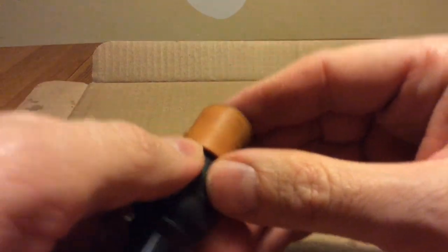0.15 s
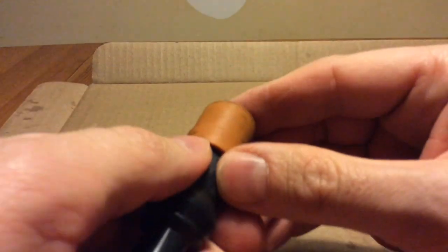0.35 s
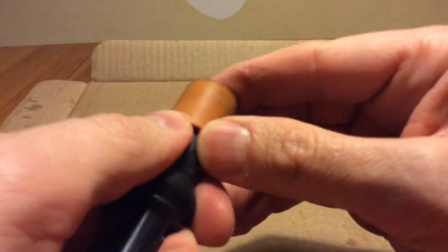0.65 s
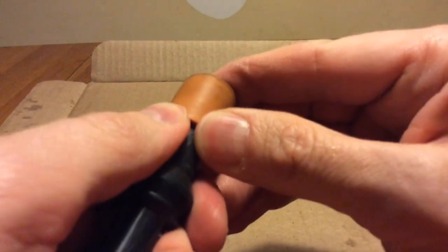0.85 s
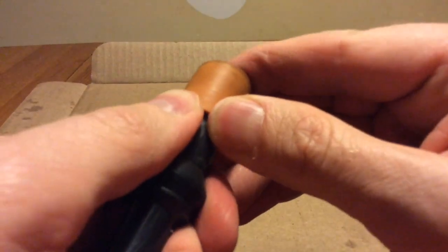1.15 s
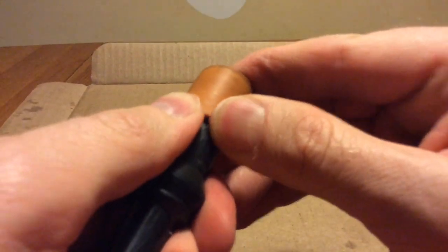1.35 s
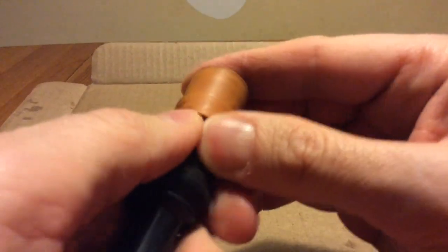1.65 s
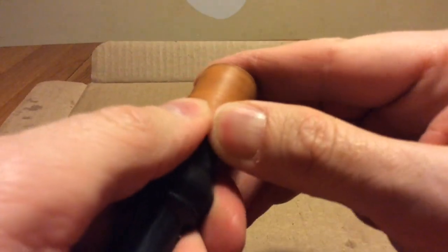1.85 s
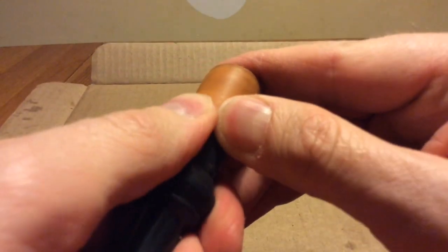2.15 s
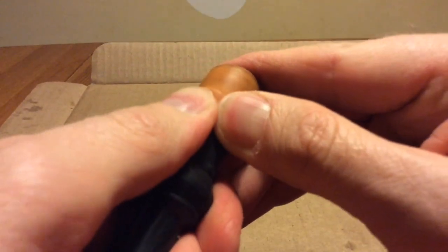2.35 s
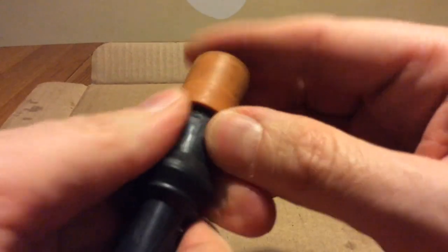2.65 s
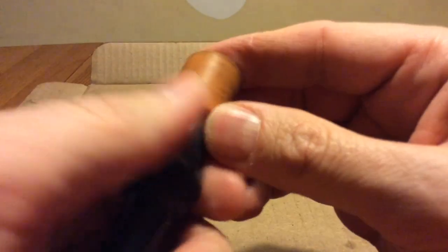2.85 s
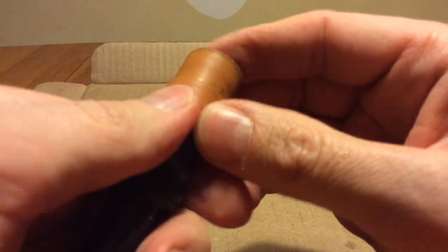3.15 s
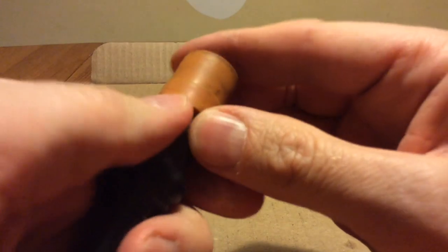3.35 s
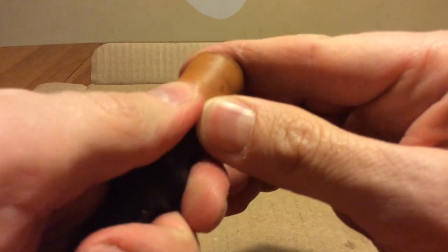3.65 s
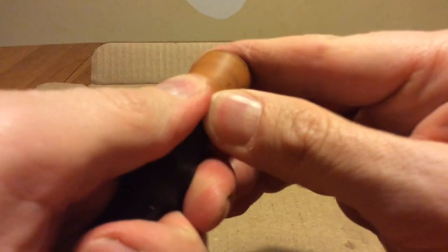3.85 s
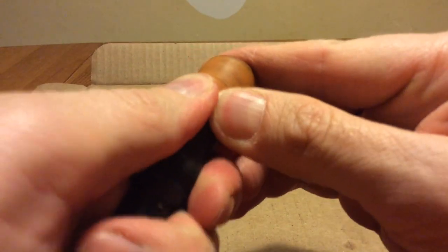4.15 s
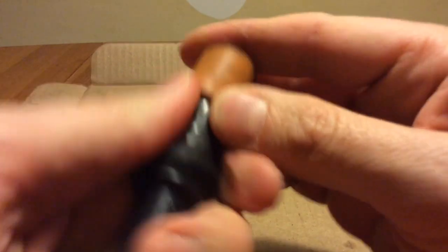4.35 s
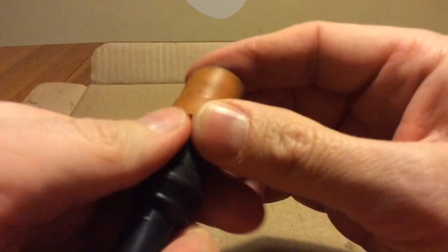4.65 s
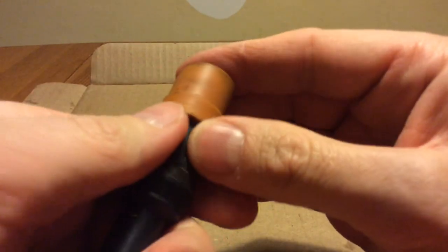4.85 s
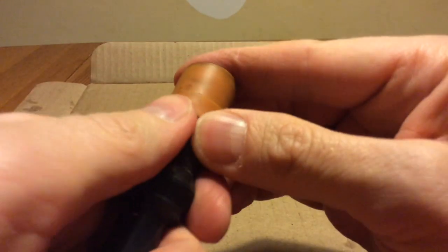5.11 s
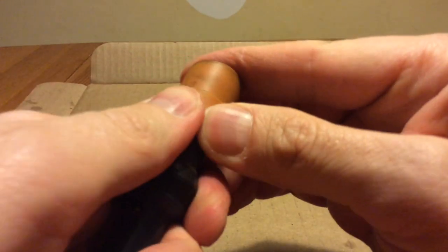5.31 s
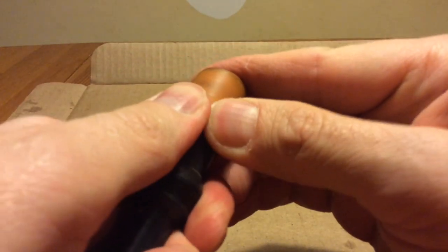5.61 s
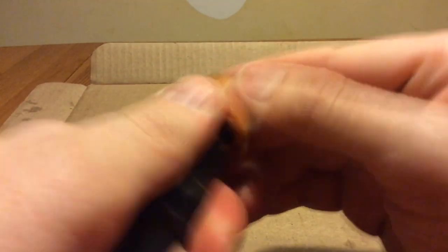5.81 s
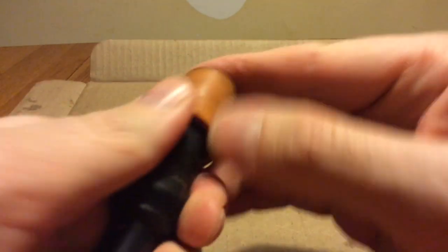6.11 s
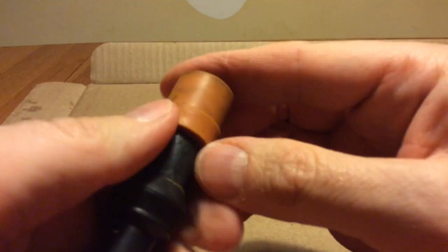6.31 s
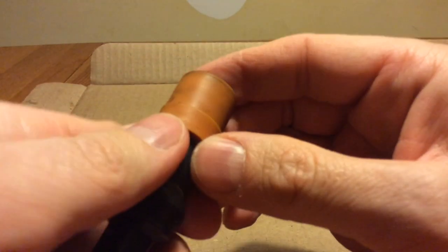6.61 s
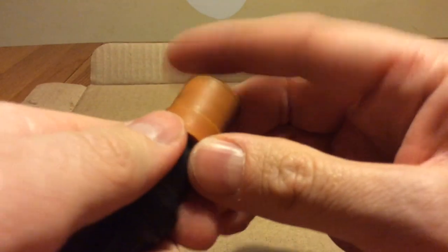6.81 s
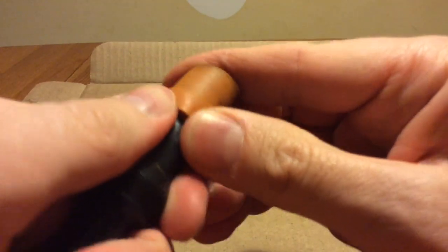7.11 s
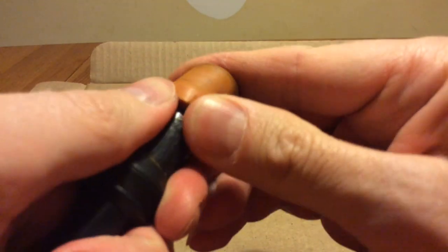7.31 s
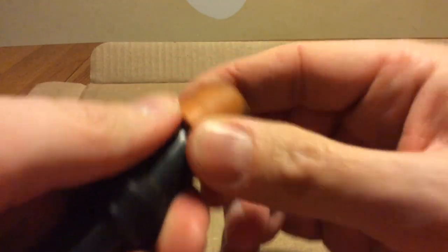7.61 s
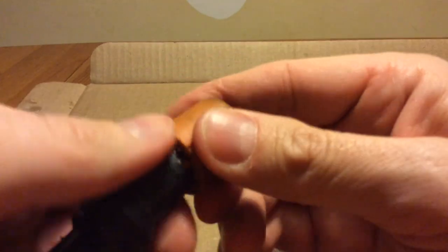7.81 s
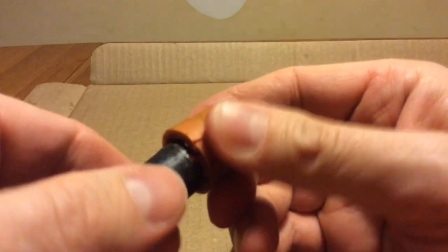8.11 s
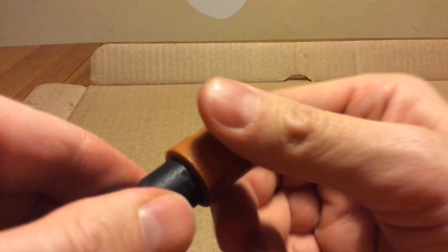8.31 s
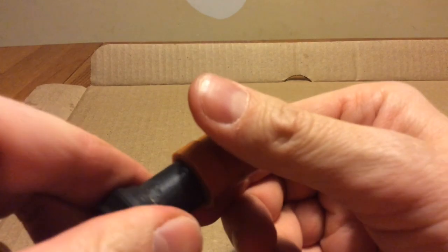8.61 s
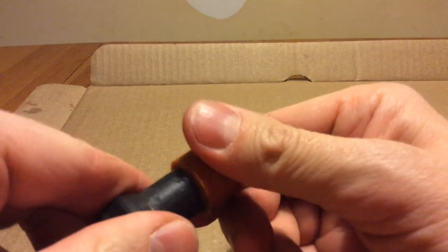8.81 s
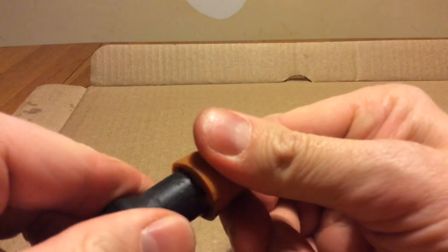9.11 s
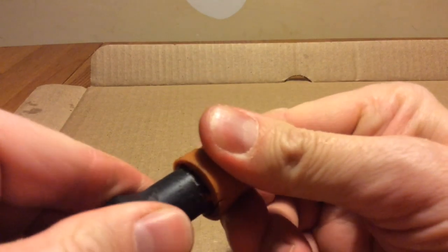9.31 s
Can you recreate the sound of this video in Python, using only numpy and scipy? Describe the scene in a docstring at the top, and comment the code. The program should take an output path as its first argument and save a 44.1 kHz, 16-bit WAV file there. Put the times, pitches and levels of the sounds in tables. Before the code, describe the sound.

Fingers twist a rubber boot on a car part, making a soft grainy rubbing with faint squeaks. Early on, the part knocks against a cardboard box. The stuck rubber lets go in two runs of sharp snaps, the hands bump, then a crackling peel ends in one hollow pop. More rubbing, soft bumps and a faint squeak follow, all close to the microphone in a small quiet room.

```python
"""Two hands twist and pull a rubber boot off an ignition coil, close up, over a cardboard box in a
small quiet room. Skin rubs and squeaks on the rubber from the start; at 0.5 s the coil knocks on the box.
The stuck boot lets go in runs of sharp snaps at 2.3 s and 4 s, and the hands bump as they change grip.
From 5.6 s the rubber peels for good, until the seal opens with one hollow pop at 5.9 s.
More rubbing, soft bumps and two stray snaps follow, and a faint squeak closes the scene."""
import sys
import numpy as np
from scipy import signal
from scipy.fft import rfft, irfft
from scipy.io import wavfile

SR = 44100
rng = np.random.default_rng(int(sys.argv[2]) if len(sys.argv) > 2 else 0)


def unload_audio(sound):
    """Save the sound as a 16-bit wav file, at the path given as the first command line argument."""
    columns = np.transpose(np.atleast_2d(sound))
    # keep every value between -1 and 1, then stretch to whole-number steps
    steps = np.round(np.clip(columns, -1, 1) * 32767)
    wavfile.write(sys.argv[1], SR, steps.astype(np.int16))


N = 417186
TIME = np.arange(N) / SR
LOW_CUT_HZ, HIGH_CUT_HZ = 60.26, 15250

# Spectra and most resonance levels are relative;
# fan, squeak, creak, knock and pop levels set the loudness directly.

# room tone, air and hiss: f/Hz, density/dB
AIR_SPECTRUM = [(25, -2.5), (101, -6), (226, 1), (479, -8), (563, -13.5), (644, -15.5), (756, -14.5),
                (1290, -31), (2460, -33), (3220, -26.5), (4820, -30), (9440, -42.5), (15300, -43.5)]
# faint fan tones: f/Hz, level/dB
FAN_TONES = [(215, -84.5), (538, -75.5), (587, -78)]
# the holding fingers creep over the rubber throughout: t/s, level/dB
GRIP_CREEP = [(0, -68), (1.15, -64.5), (1.3, -71), (1.45, -73), (2.2, -69.5), (2.45, -74), (2.55, -77),
              (2.65, -64), (3.6, -68), (4.15, -75), (4.4, -58.5), (4.95, -73.5), (5.2, -68.5), (6.7, -72.5),
              (7.5, -66), (8.55, -68), (8.75, -72)]
# finger slides: t/s, length/s, level/dB, pressure on the hollow boot/0-1, contact resonance f/Hz
FINGER_STROKES = [(0.0, 0.012, -47, 0.33, 2860), (0.29, 0.86, -62, 0.6, 5500),
                  (0.444, 0.33, -56.5, 0.05, 4100), (0.95, 0.16, -61, 0.2, 2120),
                  (1.446, 0.035, -57, 0.09, 4050), (1.513, 0.34, -58.5, 0.2, 5260),
                  (1.971, 0.044, -62, 0.34, 3770), (2.057, 0.039, -58.5, 0.08, 4000),
                  (2.242, 0.076, -61.5, 0.18, 4500), (2.329, 0.037, -53.5, 0.53, 2300),
                  (2.573, 0.046, -57.5, 0.08, 3870), (2.672, 0.089, -57, 0.14, 4150),
                  (2.838, 0.076, -58.5, 0.22, 3400), (3.344, 0.049, -60, 0.2, 2020),
                  (3.484, 0.089, -64.5, 0.42, 2550), (4.31, 0.13, -58, 0.11, 7640),
                  (4.517, 0.27, -56.5, 0, 7440), (4.812, 0.071, -62.5, 0, 7700),
                  (5.06, 0.089, -64.5, 0.32, 3630), (5.219, 0.041, -62, 0.18, 3000),
                  (5.497, 0.25, -63, 0.08, 12200), (5.851, 0.17, -48.5, 0.1, 4230),
                  (6.043, 0.058, -56.5, 0.62, 620), (6.104, 0.15, -54.5, 0.36, 647),
                  (6.256, 0.18, -61, 0.05, 5830), (6.397, 0.084, -56.5, 0, 7500),
                  (6.825, 0.16, -61, 0.47, 2350), (7.064, 0.16, -50.5, 0.38, 2320),
                  (7.24, 0.087, -50.5, 0.34, 2420), (7.613, 0.11, -49.5, 0.48, 2300),
                  (7.891, 0.016, -45, 0.36, 2220), (7.986, 0.11, -54.5, 0.22, 2730),
                  (8.207, 0.084, -61, 0.67, 1810), (8.33, 0.062, -60, 0.2, 1900)]
# tone colour of skin on rubber: f/Hz, density/dB
RUB_SPECTRUM = [(590, -34.5), (1000, -13), (1280, -11.5), (1680, -8), (1910, -12), (2310, -7), (2650, -10),
                (3640, -11.5), (4780, -9), (6060, -11), (15000, -6)]
# resonances of the boot under a drag: f/Hz, width/Hz, level/dB
BOOT_MODES = [(161.2, 120, 2.5), (340, 73, 5.5), (566.6, 130, 7), (1547, 320, -19), (2264, 130, 5)]
# fingertip squeaks: start t/s, end t/s, start f/Hz, end f/Hz, level/dB, hoarseness/Hz
FINGER_SQUEAKS = [(0.438, 0.445, 1640, 1540, -56, 160), (1.523, 1.582, 1560, 1660, -58.5, 130),
                  (2.665, 2.705, 2330, 2250, -58, 80), (4.35, 4.42, 1453, 1740, -63.5, 110),
                  (4.573, 4.651, 1945, 1790, -60.5, 120), (4.984, 5.06, 1480, 1690, -69.5, 110),
                  (9.067, 9.56, 1790, 1733, -72, 190)]
# single jerks of a fingertip on the boot: t/s, level/dB
FINGER_CREAKS = [(2.8937, -62), (2.925, -63.5), (2.9645, -69), (3.011, -61.5), (3.021, -67.5), (3.051, -75)]
# the coil's far end knocks on the box and rocks: t/s, level/dB, contact cut-off f/Hz
BOX_KNOCKS = [(0.4765, 0.5, 3500), (0.4925, -7, 800), (0.5055, -6.5, 800), (0.5195, -7.5, 300),
              (1.382, -29, 58.5), (1.62, -27.5, 60)]
# ring of box and table: f/Hz, level/dB, t60/s
BOX_MODES = [(82.4, -29, 0.115), (137, -32, 0.043), (303.6, -31.5, 0.088), (450, -31.5, 0.033),
             (734, -36.5, 0.017), (967, -36, 0.057), (1174, -25, 0.015), (1610, -27, 0.017),
             (2330, -29, 0.011)]
# soft bumps as the hands change grip: t/s, level/dB, contact cut-off f/Hz
GRIP_BUMPS = [(0.2635, -12, 70), (4.248, -34, 3000), (4.4812, -5, 2000), (4.4828, -2.5, 600),
              (5.8795, -18.5, 3000), (6.05, -23, 299), (6.118, -22, 200), (6.14, -26, 61),
              (7.097, -21, 100), (7.266, -21, 1500), (7.8905, -18.5, 128), (8.138, -22.5, 91),
              (8.158, -23.5, 89.7)]
# ring of hand and coil together: f/Hz, level/dB, t60/s
GRIP_MODES = [(90, -39, 0.094), (147, -36.5, 0.074), (322, -25.5, 0.036), (431, -25.5, 0.028),
              (628, -18, 0.013), (943.4, -30, 0.034), (1379.8, -33, 0.015), (2320, -26.5, 0.0064),
              (3200, -24.5, 0.0069)]
# the rubber peels, briefly and then for good; a curve each: t/s, snaps/s, level/dB, tilt/(dB/octave)
PEEL_CURVES = [
    [(2.255, 165, -41, 7), (2.3, 350, -50, 27), (2.33, 620, -37.5, -21.5), (2.385, 320, -46, 0)],
    [(5.62, 620, -44, 10), (5.74, 66, -47.5, 9.5), (5.83, 270, -36.5, 9), (5.872, 1800, -39, 4),
     (5.881, 2700, -24.5, 3.5), (5.888, 1900, -42.5, -5), (5.906, 1500, -40.5, -9)],
]
# stuck rubber lets go: t/s, level/dB, treble tilt/(dB/octave), body/dB
RUBBER_SNAPS = [(0.2635, -37, -2.0, 22), (0.4101, -33.5, -2.5, 9), (1.401, -41.5, 6, -3),
                (2.3047, -24, 1.5, -10), (2.3112, -16.5, 7, -2), (2.3237, -15, -4, -14),
                (2.325, -16, -2, 6.5), (2.3298, -26, -4.0, 1), (2.3371, -18, -6.0, -9),
                (2.3406, -28, 2.0, 2), (2.3489, -14, -11, -5), (2.3555, -27, 9, 5), (3.859, -48, 2, -1),
                (3.9624, -20, 1.5, -0.5), (3.9683, -36.5, -5, 16.5), (3.9745, -30, 1, -12),
                (4.0142, -39, 6, -11), (4.0166, -36.5, 2, -2), (4.0215, -39, 0.5, -9),
                (4.0392, -39.5, 1, -12), (5.613, -20.1, -1.5, 7.5), (5.685, -29.5, 8.5, -6),
                (5.7045, -25, 14, -7.5), (5.7213, -30.5, 13, -10), (5.7602, -37.5, 2.5, 4.5),
                (5.7799, -23.5, 11, -6), (5.7885, -37.5, 5.5, -2), (5.8065, -31.5, 4.5, -2.5),
                (5.828, -33.5, 7, -1), (5.8483, -25, 5.5, 0), (5.8567, -23, 1.5, 8),
                (5.866, -30.5, -1.0, 11.5), (5.8782, -19, 6.5, 0.5), (5.9067, -15.5, -3.5, 13),
                (5.9079, -14.5, 1.5, 8.5), (7.3633, -33.5, -1.5, 11.5), (9.0705, -37.5, 0, 14)]
# ring of a snap, soft boot low and stiff coil neck high: f/Hz, width/Hz, level/dB
SNAP_MODES = [(562, 380, -25), (1497, 530, -22), (2380, 600, -15), (4700, 800, -0.5), (6500, 1077, 1),
              (8230, 1200, 2.5), (10100, 900, 4.5), (13720, 870, 6), (14800, 1000, -4)]
# air in the boot's bore: f/Hz, level/dB, t60/s
BORE_MODES = [(93, -36.5, 0.082), (670, -23, 0.021), (1102.6, -10.5, 0.01), (1470, -2.5, 0.0092),
              (2300, -23.5, 0.0054), (3700, -15.5, 0.005)]


def from_db(db):
    """Decibels to gain."""
    return 10 ** (np.asarray(db) / 20)


def unit_rms(x):
    """Scale to rms 1."""
    return x / np.sqrt(np.mean(x ** 2) + 1e-20)


def butter(x, hz, kind="low", order=2):
    """Butterworth filter, low-pass by default."""
    return signal.sosfilt(signal.butter(order, hz, kind, fs=SR, output="sos"), x)


def drift(rate_hz, size=N):
    """Smooth random modulator, rms 1."""
    return unit_rms(butter(rng.standard_normal(size + SR), rate_hz)[SR:])


def colour(x, spectrum):
    """EQ a noise with a curve; rms 1."""
    hz, db = np.transpose(spectrum)
    bins = np.maximum(np.fft.rfftfreq(N, 1 / SR), 1)
    curve = from_db(np.interp(np.log(bins), np.log(hz), db))
    return unit_rms(irfft(rfft(x) * curve, N))


def resonance(x, hz, width_hz):
    """Two-pole band-pass, unity gain at the peak."""
    r = np.exp(-np.pi * width_hz / SR)
    feedback = [1, -2 * r * np.cos(2 * np.pi * hz / SR), r * r]
    return signal.lfilter(np.array([1, 0, -1]) * (1 - r * r) / 2, feedback, x + 1e-18)


def decay(t, t60):
    """Exponential tail, 60 dB down at t60."""
    return np.exp(-np.log(1000) * t / t60)


def add(out, s, sound):
    """Mix a sound in from time s."""
    at = max(round(s * SR), 0)
    out[at:at + len(sound)] += sound[:max(N - at, 0)]


def room_tone(air_db):
    """The bed: air, hiss and the wavering hum of a distant fan."""
    fan = sum(from_db(db) * np.sin(2 * np.pi * hz * TIME + drift(0.668)) for hz, db in FAN_TONES)
    return np.sqrt(2) * fan + from_db(air_db) * colour(rng.standard_normal(N), AIR_SPECTRUM)


def room_reverb(x, dark_db, dark_t60, bright_db, bright_t60, dark_hz):
    """Dense reflections off close walls: a dark tail under a shorter full-range splash."""
    t = TIME[:SR // 2]
    noise = rng.standard_normal(len(t)) * np.clip(t / 0.0011 - 1, 0, 1)
    dark = butter(noise, dark_hz) * decay(t, dark_t60) / np.linalg.norm(noise * decay(t, dark_t60))
    bright = rng.permutation(noise) * decay(t, bright_t60) * (t > .003)
    response = from_db(dark_db) * dark + from_db(bright_db) * bright / np.linalg.norm(bright)
    return signal.fftconvolve(x, response)[:N]


def stroke_envelopes(release_s=0.015, sag_db_per_s=24.5, lead_s=0.1):
    """Skin starts to slide, slows and sticks again: yields (start, envelope, pressure, contact Hz)."""
    for start, length, db, pressure, hz in FINGER_STROKES:
        begin = max(start - lead_s, 0)
        t = TIME[:round((length + 3 * lead_s) * SR)] + begin - start
        attack_s = 0.0013 + 0.074 * length   # longer strokes ease in
        gate = (1 + np.tanh(t / (2 * attack_s))) * (1 + np.tanh((length - t) / (2 * release_s))) / 4
        yield begin, gate * from_db(db - sag_db_per_s * np.clip(t, 0, length)), pressure, hz


def finger_envelopes():
    """The friction of all the fingers and their force on the boot, each summed in power."""
    friction = from_db(np.interp(TIME, *np.transpose(GRIP_CREEP))) ** 2
    force = np.zeros(N)
    for s, envelope, pressure, _ in stroke_envelopes():
        add(friction, s, envelope ** 2)
        add(force, s, (pressure * envelope) ** 2)
    return np.sqrt(friction), np.sqrt(force)


def shifting_bands(noises, depth_db, rate_hz, count):
    """As the contact moves, bands cut from two noises swell and fade at a steady total level."""
    edges = np.geomspace(900, HIGH_CUT_HZ, count + 1)
    gains = from_db([depth_db * drift(rate_hz) for _ in range(count)])
    bands = [butter(noises[k % 2], edges[k:k + 2], "band") for k in range(count)]
    power = np.average(gains ** 2, axis=0, weights=np.diff(edges))
    return np.sum(gains * bands, axis=0) / np.sqrt(power)


def rubbing(friction, gain_db, grain_db, flutter_db, body_ceiling_db, split_hz):
    """Countless tiny uneven slips make a grainy hiss; past the ceiling only the treble grows."""
    slips = rng.standard_normal((2, N)) * from_db(grain_db * drift(900))
    hiss = colour(shifting_bands(slips, depth_db=2.8, rate_hz=7, count=22), RUB_SPECTRUM)
    body = butter(hiss, split_hz, order=3) * np.minimum(friction, from_db(body_ceiling_db))
    rasp = butter(hiss, split_hz, "high", order=3) * friction
    return (body + rasp) * from_db(gain_db + flutter_db * drift(40))


def skin_ring(gain_db, width_share):
    """The patch of skin under each stroke rings broadly at a pitch of its own."""
    out = np.zeros(N)
    for s, envelope, _, hz in stroke_envelopes():
        band = resonance(rng.standard_normal(len(envelope)), hz, width_share * hz)
        ring = resonance(band, hz, width_share * hz)
        add(out, s, from_db(gain_db) * envelope * unit_rms(ring))
    return out


def drags(force, gain_db, judder_db, lump_db, lump_hz):
    """A firm finger judders over the boot: the low resonances shake in lumps, the high ones less."""
    judder = rng.standard_normal(N) * from_db(judder_db * drift(120))
    body = np.zeros(N)
    for k, (hz, width, db) in enumerate(BOOT_MODES):
        lumps = from_db(lump_db * np.sqrt(BOOT_MODES[0][0] / hz) * drift(lump_hz))
        body += (-1) ** k * from_db(db) * resonance(judder * lumps, hz, width)
    return from_db(gain_db) * force * unit_rms(body)


def squeaks():
    """Unsteady stick-slip: a hoarse narrow band that glides."""
    out = np.zeros(N)
    for start, end, from_hz, to_hz, db, width_hz in FINGER_SQUEAKS:
        size = round((end - start) * SR)
        phase = 2 * np.pi * np.cumsum(np.linspace(from_hz, to_hz, size)) / SR
        hoarse = drift(width_hz, size) * np.cos(phase) + drift(width_hz, size) * np.sin(phase)
        flat_swell = np.hanning(size) ** 0.25
        add(out, start, from_db(db) * flat_swell * unit_rms(hoarse))
    return out


def creaks(hz, width_hz, slip_t60):
    """A fingertip jerks forward once: a crisp attack and a short damped ring."""
    out, t = np.zeros(N), TIME[:SR // 50]
    for s, db in FINGER_CREAKS:
        slip = rng.standard_normal(len(t)) * decay(t, slip_t60)
        add(out, s, from_db(db) * unit_rms(resonance(slip, hz, width_hz)))
    return out


def knocks(hits, modes, rattle_db, rattle_t60, scuff_db, scuff_t60):
    """A push and a short rattle ring the modes; a soft contact is duller, and the surfaces scuff."""
    out, t = np.zeros(N), TIME[:SR // 3]
    body = sum((-1) ** k * from_db(db) * decay(t, t60) * np.sin(2 * np.pi * hz * t)
               for k, (hz, db, t60) in enumerate(modes))
    for s, db, contact_hz in hits:
        force = from_db(rattle_db) * rng.standard_normal(len(t)) * decay(t, rattle_t60)
        force[0] += 1   # the push
        thud = butter(signal.fftconvolve(force, body)[:len(t)], contact_hz, order=1)
        scuff = from_db(scuff_db) * rng.standard_normal(len(t)) * decay(t, scuff_t60)
        add(out, s, from_db(db) * (thud / np.linalg.norm(thud) + scuff))
    return out


def peeling(spread_db, body_db):
    """Peeling rubber crackles: tiny snaps at random moments, in rows like RUBBER_SNAPS."""
    rows = []
    for curve in PEEL_CURVES:
        s, per_s, db, tilt = np.transpose(curve)
        fires = rng.random(N) < np.interp(TIME, s, per_s, left=0, right=0) / SR
        times = TIME[fires]
        levels = np.interp(times, s, db) + spread_db * rng.standard_normal(N)[fires]
        rows += zip(times, levels, np.interp(times, s, tilt), np.full(len(times), body_db))
    return rows


def snaps(rows, gain_db, tear_db, tear_t60, detune_share, spread_db):
    """A sharp release and a brief tear ring boot and coil neck, a little differently at each spot."""
    out, t = np.zeros(N), TIME[:SR // 80]
    max_snaps = 1000
    tears = rng.standard_normal((max_snaps, len(t)))
    spots = rng.uniform(-1, 1, (max_snaps, len(SNAP_MODES), 2)) * np.sqrt(3)
    for (s, db, tilt, body_db), tear, spot in zip(rows, tears, spots):
        force = from_db(tear_db) * tear * decay(t, tear_t60)
        force[0] += 1   # the release
        tick = np.zeros(len(t))
        for k, ((hz, width, mode_db), (detune, strength)) in enumerate(zip(SNAP_MODES, spot)):
            tone_db = body_db if hz < 3500 else tilt * np.log2(hz / 9000)   # boot below, neck above
            gain = from_db(mode_db + spread_db * strength + tone_db)
            tick += (-1) ** k * gain * resonance(force, hz * (1 + detune_share * detune), width)
        add(out, s, from_db(db + gain_db) * tick / np.linalg.norm(tick))
    return out


def seal_pop(at_s, opening_s):
    """Suction breaks: the air in the bore swings inward first and rings for a few cycles."""
    out, t = np.zeros(N), TIME[:SR // 5]
    swing = sum(from_db(db) * decay(t, t60) * np.sin(2 * np.pi * hz * t) for hz, db, t60 in BORE_MODES)
    add(out, at_s, -swing * (1 - np.exp(-t / opening_s)))
    return out


def scene():
    """Mono mix over room tone: the finger noise stays dry, the hits feed the reverb."""
    friction, force = finger_envelopes()
    fingers = rubbing(friction, gain_db=-0.4, grain_db=2.0, flutter_db=1.72,
                      body_ceiling_db=-49.5, split_hz=5705)
    fingers += skin_ring(gain_db=-8.5, width_share=0.24)
    fingers += squeaks()
    fingers += creaks(hz=1590, width_hz=180, slip_t60=0.013)
    fingers += drags(force, gain_db=6.0, judder_db=2.0, lump_db=3.5, lump_hz=45)
    snap_rows = list(RUBBER_SNAPS) + peeling(spread_db=3.5, body_db=2.5)
    hits = snaps(snap_rows, gain_db=11.5, tear_db=-16.5, tear_t60=0.012,
                 detune_share=0.046, spread_db=0.24)
    hits += seal_pop(at_s=5.9079, opening_s=0.00023)
    hits += knocks(BOX_KNOCKS, BOX_MODES, rattle_db=-31, rattle_t60=0.16, scuff_db=-42.5, scuff_t60=0.036)
    hits += knocks(GRIP_BUMPS, GRIP_MODES, rattle_db=-26.5, rattle_t60=0.065,
                   scuff_db=-39, scuff_t60=0.05)
    reverb = room_reverb(hits, dark_db=-16.5, dark_t60=0.3, bright_db=-15, bright_t60=0.119, dark_hz=2000)
    return (fingers + hits + reverb + room_tone(air_db=-62.62))[None]


def record(dry):
    """The small microphone loses the deep bass; the top is cut steeply."""
    high_cut = signal.ellip(10, .2, 70, HIGH_CUT_HZ, fs=SR, output="sos")
    return signal.sosfilt(high_cut, butter(dry, LOW_CUT_HZ, "high", order=3))


dry = scene()
out = record(dry)
unload_audio(out)
```